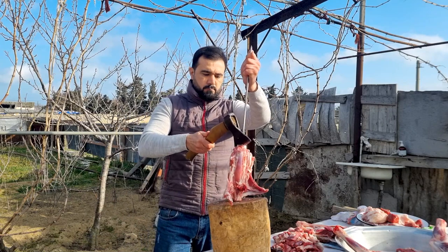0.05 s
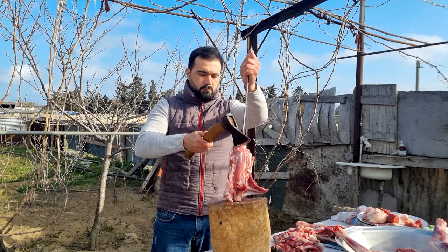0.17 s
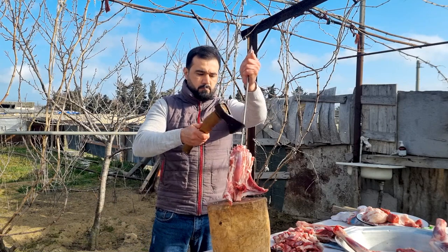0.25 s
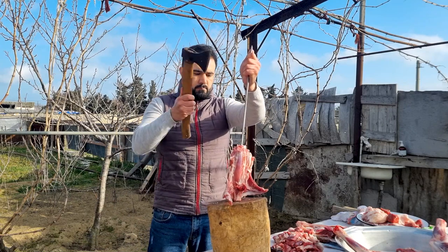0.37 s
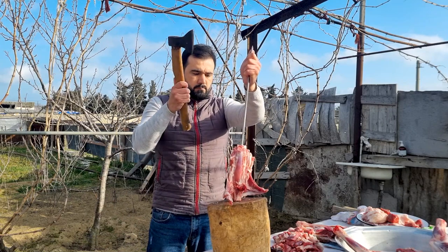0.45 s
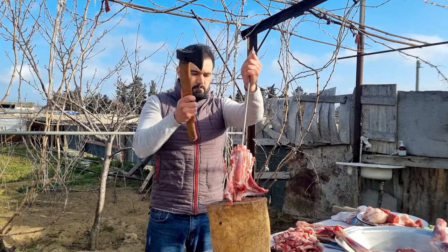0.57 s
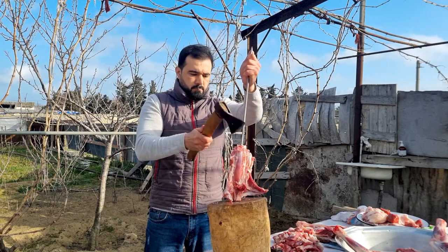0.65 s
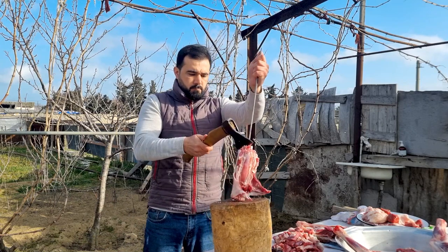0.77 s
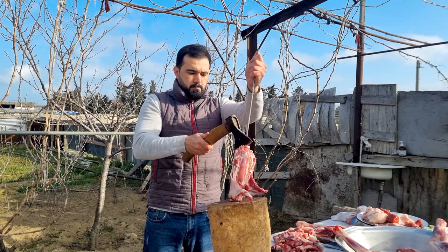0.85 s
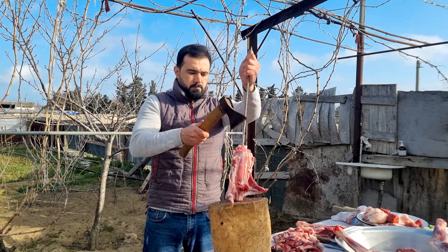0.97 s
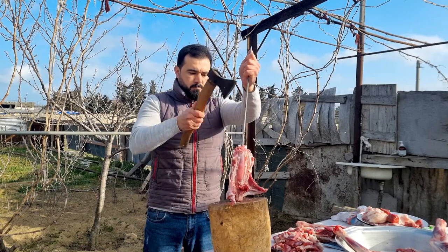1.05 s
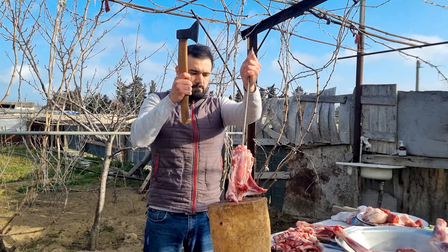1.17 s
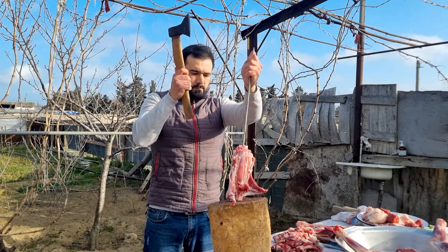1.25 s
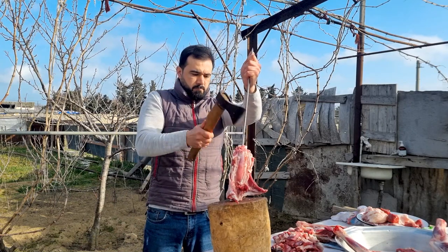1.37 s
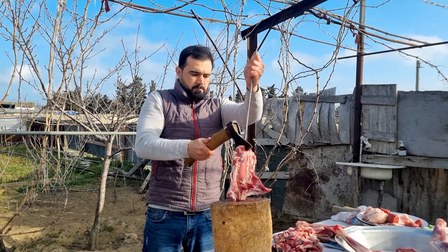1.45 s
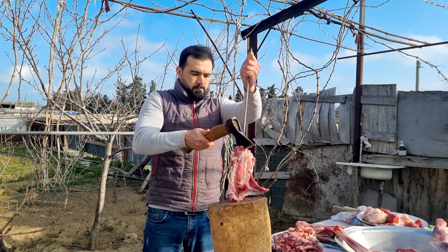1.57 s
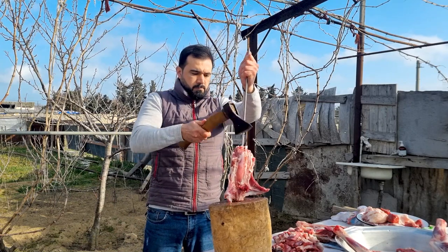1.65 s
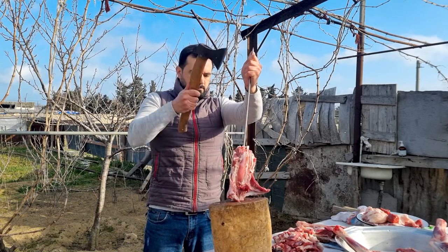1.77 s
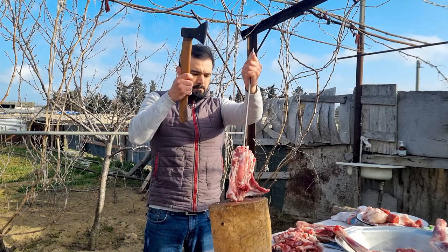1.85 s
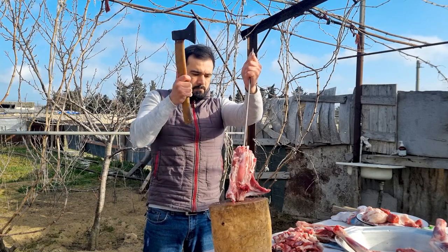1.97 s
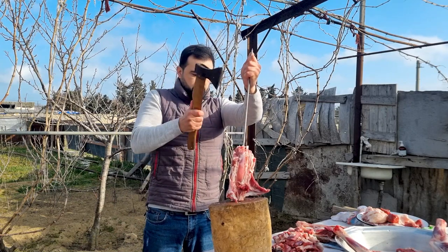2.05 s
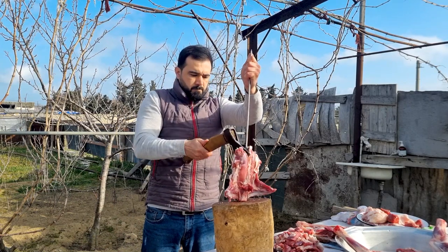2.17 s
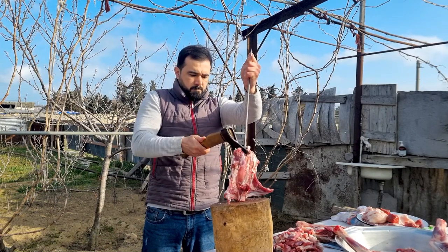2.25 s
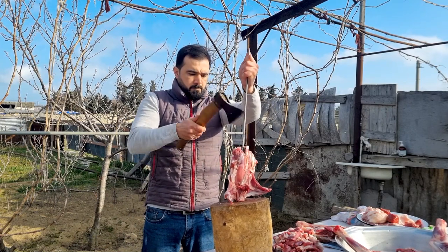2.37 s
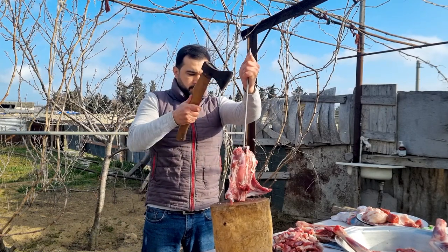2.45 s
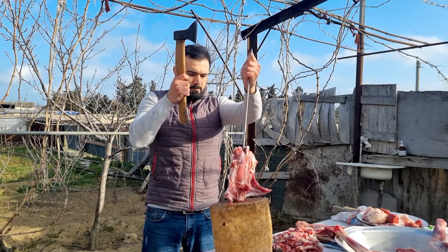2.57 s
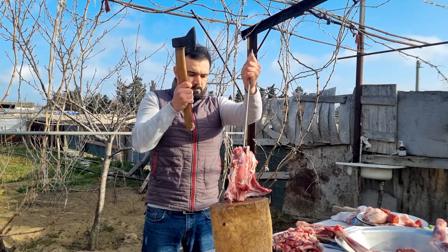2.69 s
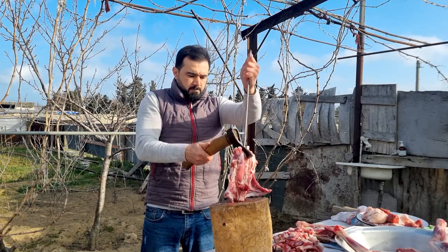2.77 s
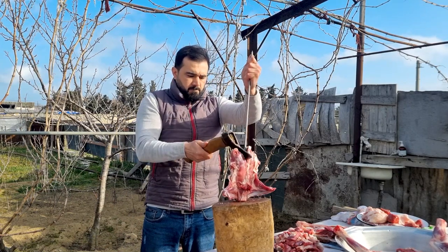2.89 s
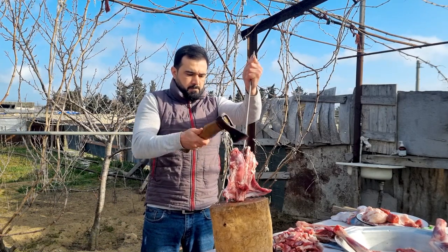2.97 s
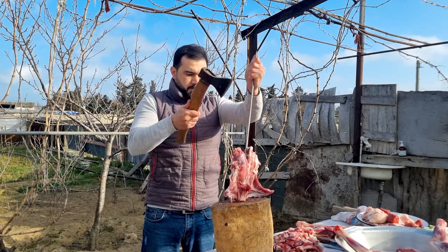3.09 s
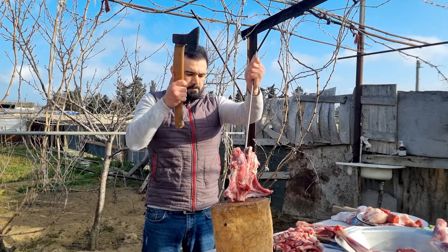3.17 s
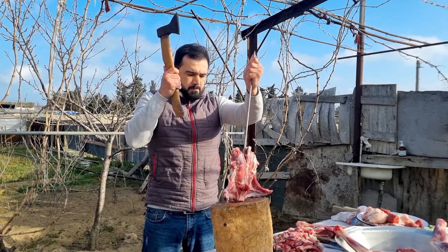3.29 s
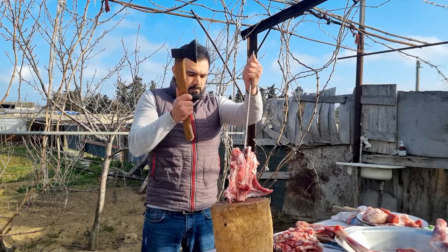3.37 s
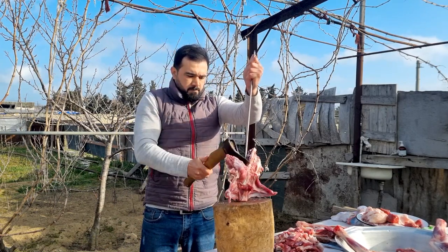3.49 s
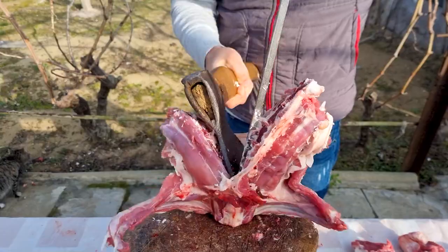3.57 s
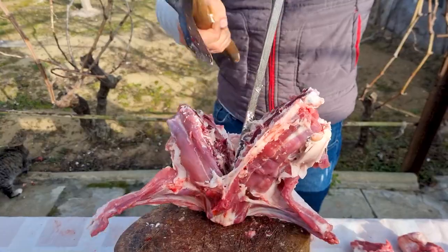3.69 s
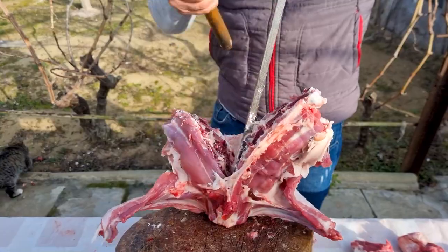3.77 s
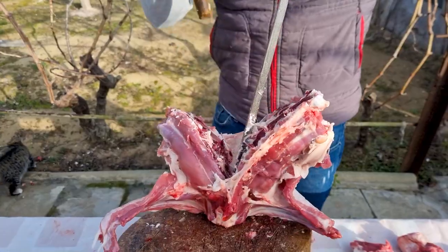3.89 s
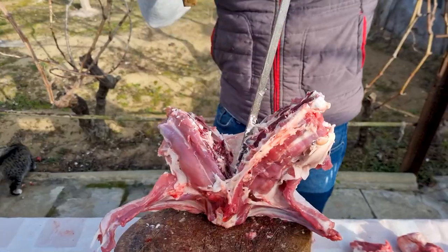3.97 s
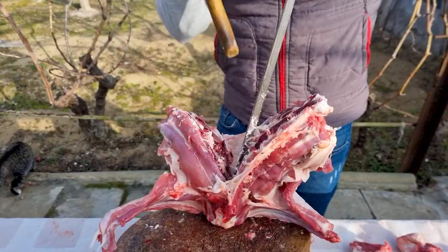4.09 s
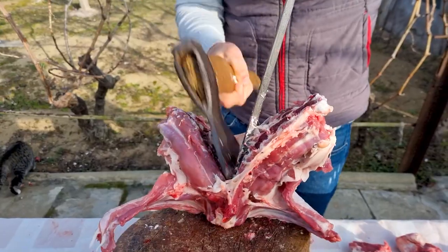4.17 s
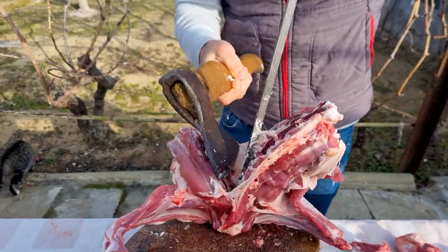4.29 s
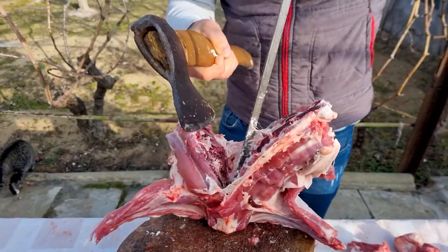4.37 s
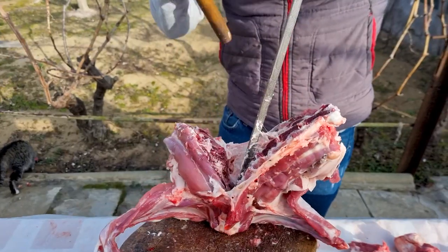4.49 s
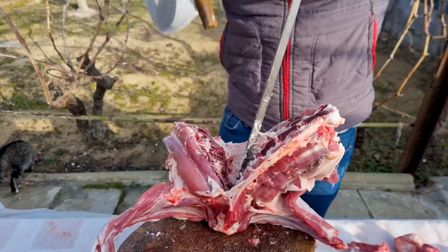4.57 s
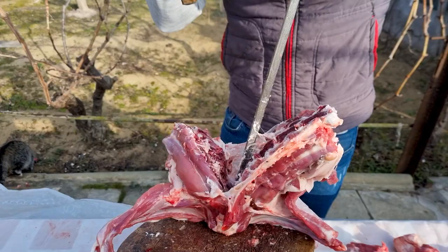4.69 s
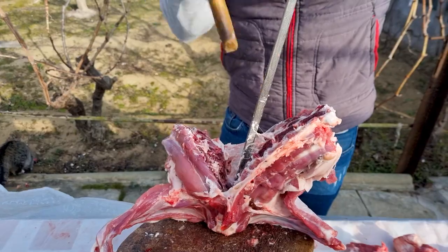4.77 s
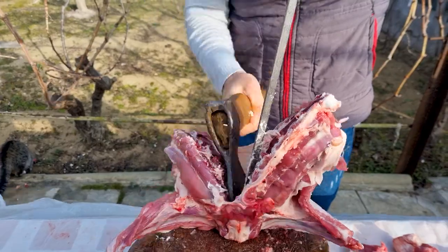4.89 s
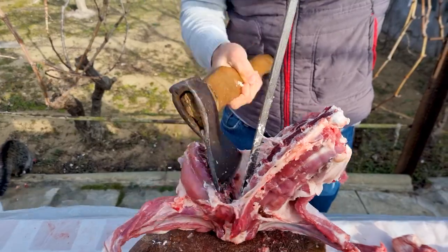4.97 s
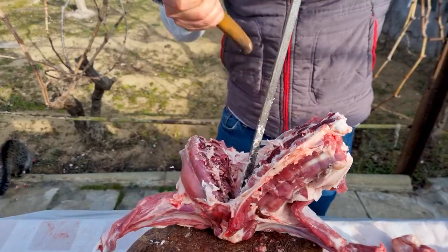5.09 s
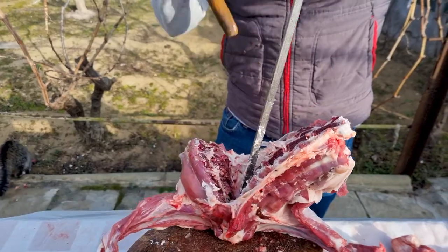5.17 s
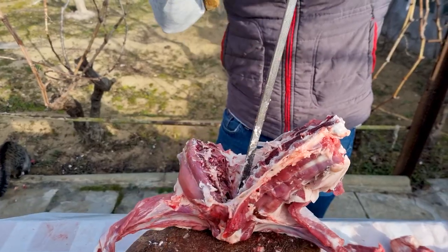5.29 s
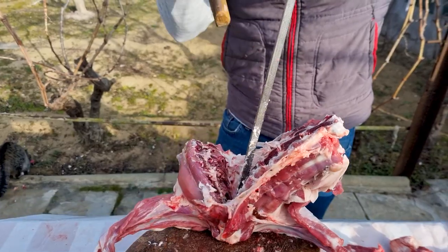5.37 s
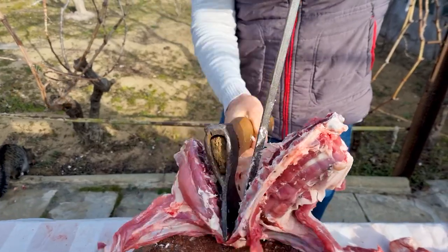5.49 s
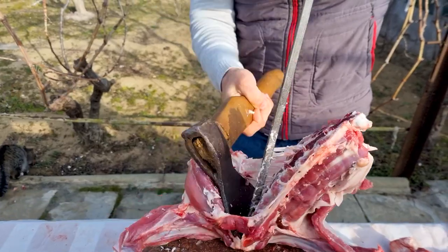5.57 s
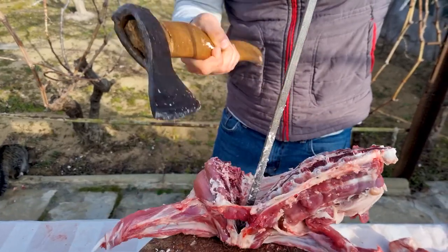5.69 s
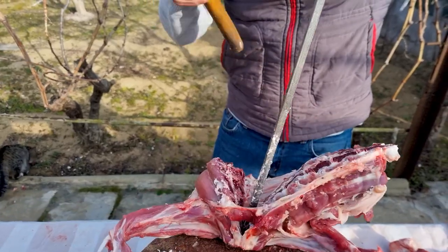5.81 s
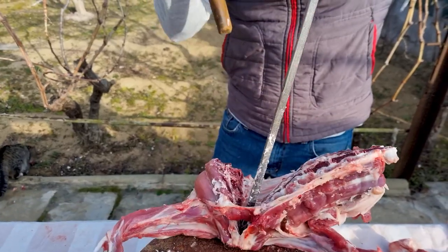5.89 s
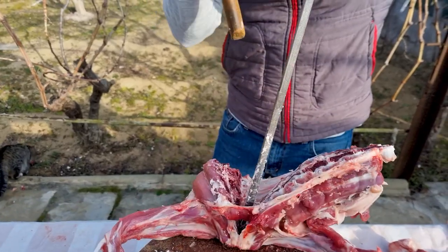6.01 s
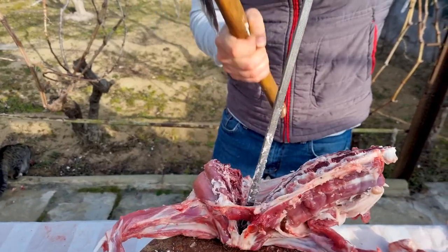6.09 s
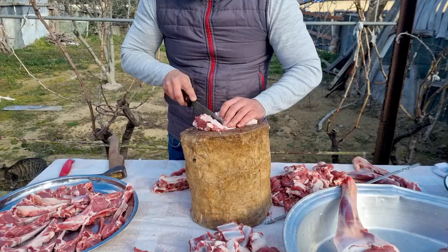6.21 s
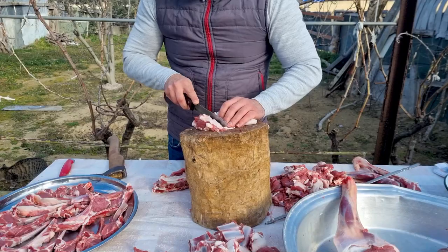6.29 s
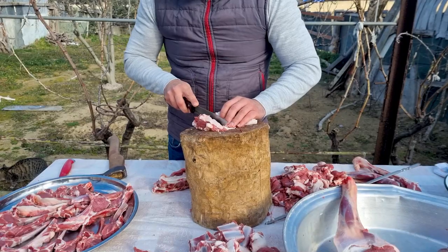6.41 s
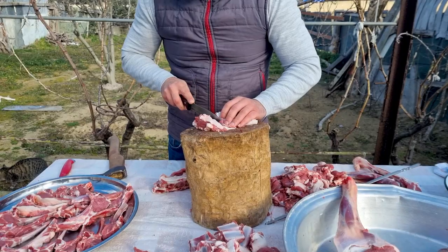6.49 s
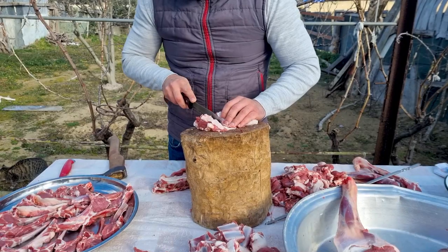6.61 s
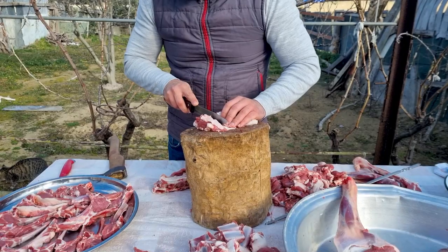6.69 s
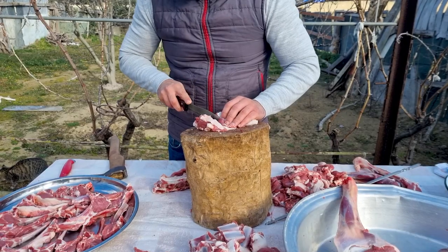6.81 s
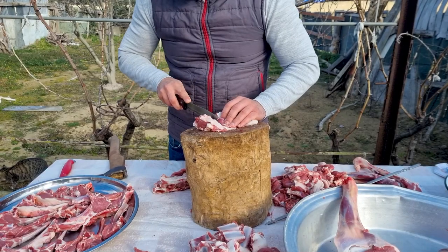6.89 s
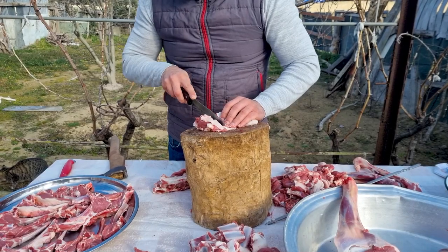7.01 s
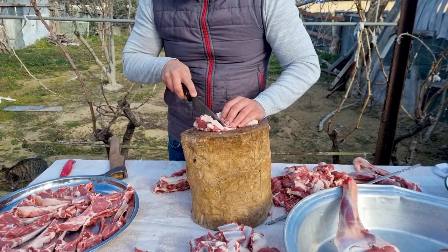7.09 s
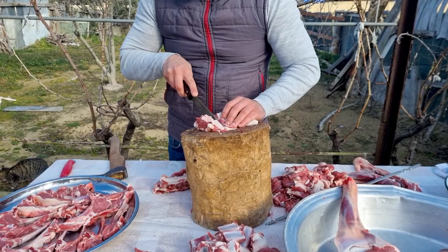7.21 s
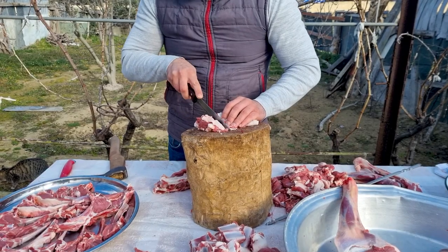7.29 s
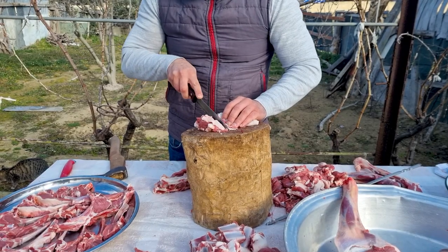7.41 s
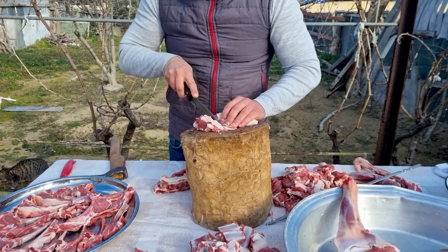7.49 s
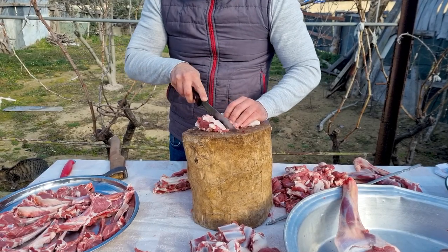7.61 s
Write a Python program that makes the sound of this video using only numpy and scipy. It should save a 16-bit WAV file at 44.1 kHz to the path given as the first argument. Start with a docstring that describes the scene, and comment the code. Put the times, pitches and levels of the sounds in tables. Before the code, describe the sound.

A hatchet chops meat and bone on a wooden block, nine loud blows about 0.7 seconds apart. Each is a sharp crack with a wet crunch, low thump and quick rattle of block, table and metal trays. The first five have a short yard echo; the last four are closer and drier, with wind buffeting the microphone. After the last chop, faint traffic hiss and machine whine step up.

```python
"""Nine sharp bony cracks, each with a thump and a rattle: a hatchet chops through ribs on a wooden block in a yard.
Each blow snaps bone with noise and a short note, thumps the block in a few decaying modes, and sets it knocking
on a table with metal trays; the blade rings faintly. The first five blows are heard from afar, the rest from
close by. Shaped noise makes the low rumble, the wind on the microphone and far traffic; a faint machine whines."""
import sys
import numpy as np
from scipy import signal
from scipy.fft import rfft, irfft, next_fast_len
from scipy.io import wavfile
from scipy.ndimage import uniform_filter1d, map_coordinates

SR = 44100
rng = np.random.default_rng(int(sys.argv[2]) if len(sys.argv) > 2 else 0)


def dump(signal):
    """Clip the signal to [-1, 1] and save it as 16-bit WAV at the path in sys.argv[1]."""
    limited = np.clip(np.atleast_2d(signal).T, -1, 1)
    pcm = np.round(limited * 32767).astype(np.int16)
    wavfile.write(sys.argv[1], SR, pcm)


N = 337365
T = np.arange(SR // 2) / SR  # seconds within one short sound
CLOCK = np.arange(N) / SR  # seconds within the whole scene
MOVE_CLOSE_S = 3.75  # from here on the block is heard from close by
SHADE_DB = -1  # from close by, the block hides the table and dulls its knock


def amp(db):
    """Decibels to gain."""
    return 10 ** (np.asarray(db) / 20)


def unit(x):
    """Scale to rms 1."""
    return x / np.sqrt(np.mean(x ** 2) + 1e-20)


def along(points, hz):
    """(Hz, value) points read on a log axis."""
    f, v = np.transpose(points)
    return np.interp(np.log(hz + 1), np.log(f + 1), v)


def wobble(rate):
    """A smooth random curve, rate knots a second."""
    return map_coordinates(rng.standard_normal(int(N * rate / SR) + 4), [CLOCK * rate])


def noise(colour, alike, size=len(T)):
    """Coloured stereo noise of rms 1 whose channels share the part alike."""
    common, *own = rng.standard_normal((3, size))
    alike = np.clip(alike, 0, 1)
    pair = np.sqrt(alike) * common + np.sqrt(1 - alike) * np.array(own)
    m = next_fast_len(size)
    gains = amp(along(colour, np.fft.rfftfreq(m, 1 / SR)))
    return unit(irfft(rfft(pair, m) * gains, m)[:, :size])


def fade(t60, attack=0.00051):
    """A quick rise, then an exponential decay by 60 dB in t60 seconds."""
    rise = 1 - np.exp(-T / max(attack, 1e-5))
    return np.exp(-np.log(1000) * T / max(t60, 1e-3)) * rise


def swell(s, half):
    """A bell-shaped rise and fall around time s."""
    return np.exp(-np.minimum(((CLOCK - s) / half) ** 2, 20))


def grit(depth_db, size):
    """An envelope of rms 1 that jumps about, as fibres give way unevenly."""
    jumps = unit(uniform_filter1d(rng.standard_normal(len(T)), size=size))
    return unit(amp(depth_db * jumps))


def ring(modes, detune):
    """Metal modes, struck at new strengths each time and reaching each ear at another phase."""
    draws = rng.standard_normal((len(modes), 4))
    out = 0
    for (hz, db, t60), d in zip(modes, draws):
        tone = np.sin(2 * np.pi * hz * (1 + detune * d[1]) * T + d[2:, None])
        out = out + amp(db + 2 * d[0]) * fade(t60) * tone
    return out


def pan(db):
    """Channel gains for a left-right difference."""
    gains = amp([[db / 2], [-db / 2]])
    return gains / gains.mean()


def add(track, s, sound):
    """Mix a sound in at time s."""
    part = track[:, round(s * SR):][:, :sound.shape[-1]]
    part += sound[..., :part.shape[1]]


def microphone(x, balance, lead_s):
    """Sound from the block reaches the left port first, and each port colours it differently."""
    size = x.shape[-1]
    m = next_fast_len(size + len(T))
    hz = np.fft.rfftfreq(m, 1 / SR)
    side = np.array([[.5], [-.5]])
    gains = amp(side * along(balance, hz))
    lead = np.exp(2j * np.pi * side * hz * lead_s)
    return irfft(rfft(x, m) * gains / gains.mean(axis=0) * lead, m)[:, :size]


# Blade meets bone. Each row: start in seconds, crack level in dB, bone pitch in Hz, bone note in dB
# and splintering in dB (both re the crack level), extra crack colour above 10 kHz in dB.
CHOPS = [(0.7282, -7.5, 5100, 1, -16, 0.5), (1.462, -7, 2634, -3.5, -11, 2.5),
         (2.1584, -9, 2650, 0.5, -10.5, 4.5), (2.8485, -7.5, 2644, -2, -11, -1),
         (3.516, -7.5, 2810, -2, -6, -2.5), (4.231, -9.5, 5365, 4.5, -20.5, -1),
         (4.9039, -8.5, 5110, 0, -12.5, 2), (5.5413, -5.5, 4120, -9, -12, 2),
         (6.1883, -5.5, 4190, 3, -13.5, 8)]
# Close modes of the bone. Each row: multiple of its pitch, level in dB.
BONE_MODES = [(.87, -8.5), (1, -1.5), (1.07, -8)]
# Colour of the crack from afar and from close by. Each row: frequency in Hz, level in dB per Hz.
CRACK_FAR = [(300, -22), (850, -18.5), (1150, -1), (2300, -13.5), (2750, -13.5), (3300, -15.5),
             (4300, -6.5), (5200, -1.5), (6200, -8.5), (7600, -38.5), (10000, -26.5), (12000, -22),
             (15000, -27), (17000, -41.5)]
CRACK_NEAR = [(300, -15.5), (700, -12), (1000, -11.5), (1650, -2), (2300, -8.5), (3300, -8.5), (4200, 0),
              (5600, -4), (7000, -20.5), (8500, -38), (10500, -27.5), (12200, -12.5), (14500, -23.5),
              (17000, -35.5)]
# Balance of the crack on the microphone, afar and close. Each row: frequency in Hz, left-right difference in dB.
SIDE_FAR = [(700, 7), (1600, 12), (2700, 14.5), (5500, 13), (10000, 11.5), (14500, 1.5)]
SIDE_NEAR = [(1000, -11), (1750, -10.5), (2600, 1), (6500, 3), (9000, -2.5), (12000, -11.5)]
SPLINTER_S = 0.0097  # how long the bone splinters


def cracks():
    """The edge snaps the bone, which sounds one very short note and splinters for some milliseconds."""
    out = np.zeros((2, N))
    for s, db, bone_hz, bone_db, split_db, top_db in CHOPS:
        colour, balance = (CRACK_FAR, SIDE_FAR) if s < MOVE_CLOSE_S else (CRACK_NEAR, SIDE_NEAR)
        colour = [(hz, level + top_db * (hz > 10 ** 4)) for hz, level in colour]
        snap = amp(3.0) * fade(.007, attack=.0003)
        split_shape = (1 - np.exp(-T / 0.002)) / (1 + (T / SPLINTER_S) ** 6)
        splitting = amp(split_db) * grit(depth_db=2.0, size=30) * split_shape
        note = sum(amp(level) * np.sin(2 * np.pi * bone_hz * k * T) for k, level in BONE_MODES)
        bone = amp(bone_db) * fade(0.021, attack=0.00037) * note
        crack = (snap + splitting) * noise(colour, alike=.7) + bone
        add(out, s, amp(db) * microphone(crack, balance, lead_s=0.00033))
    return out


# How the block answers each chop. Each row: thud level in dB before a common trim, thud pitch in Hz,
# then delay in seconds after the crack and relative level in dB of the slam, the landing and the settling.
BOUNCES = [(-7, 112, 0.021, -6, .062, -14, .105, -30), (-9.5, 127, .029, -2.5, .077, -8.5, .134, -25.5),
           (-13, 120, 0.031, -11, .074, -11, 0.09, -30.5), (-9.5, 125, .027, -4.5, .075, -13, 0.15, -39),
           (-9, 125, 0.025, -3.5, .076, -9.5, .172, -14.5),
           (-10, 103, 0.031, -12.5, .07, -15.5, .125, -17.5),
           (-9.5, 110, 0.04, -14.5, .07, -16, .127, -23.5), (-5, 103, .009, -9.5, .068, -14, .134, -18.5),
           (-10.5, 91, .014, -3.5, .072, -18.5, .144, -28)]
# Modes of the block. Each row: multiple of the thud pitch, level in dB, share of the decay time.
BLOCK_MODES = [(.6, -15, 1.8), (1, -1.5, 0.77), (1.55, -9, 0.62), (2.7, -16, 0.73)]
THUD_DELAY_S, THUD_T60_S = .008, .17


def thuds():
    """The meat passes a soft push to the heavy block, which bounces in a few low modes."""
    out = np.zeros((2, N))
    for (s, *_), (db, hz, *_) in zip(CHOPS, BOUNCES):
        body = 0
        for k, level, share in BLOCK_MODES:
            decay = fade(THUD_T60_S * share, attack=0.00047)
            body = body + amp(level) * decay * np.sin(2 * np.pi * hz * k * T)
        add(out, s + THUD_DELAY_S, amp(db + 1.0) * body * pan(-0.98))
    return out


# Colour of the woody knock. Each row: frequency in Hz, level in dB per Hz.
KNOCK_COLOUR = [(120, -13.5), (200, -2.5), (300, 10), (520, 3.5), (760, 0.5), (1300, -4), (1800, -2),
                (2100, -17.5), (5000, -53.5)]
# Colour of the clatter, also of the wet crunch. Each row: frequency in Hz, level in dB per Hz.
CLATTER_COLOUR = [(1200, -19), (2000, -0.5), (2900, -0.5), (4200, -3.5), (5600, -4.5), (6800, -10.5),
                  (8000, -24), (10500, -25.5), (12500, -12), (16000, -27)]
# Ringing of the metal trays. Each row: frequency in Hz, mean level in dB before a trim, decay t60 in seconds.
TRAYS = [(524.4, -6, 0.094), (725, -9.5, 0.1), (1257, -13, .1), (1355, -11.5, 0.12), (1656, -14.5, 0.076),
         (1745, -17.5, .13)]


def knock(contact, shade_db):
    """The block hits the table: a thump, a woody knock, a bright clatter and ringing trays."""
    db, thump_db, clatter_db, t60 = contact
    colour = [(hz, level + shade_db * (hz > 600)) for hz, level in KNOCK_COLOUR]
    wood = fade(t60, attack=0.00093) * noise(colour, alike=0.74) * pan(5)
    thump_hz = 165 * (1 + 0.42 * rng.standard_normal())
    thump = amp(thump_db + 3) * fade(0.087, attack=0.0021) * np.sin(2 * np.pi * thump_hz * T)
    clatter = amp(clatter_db + shade_db - 7) * fade(0.047) * noise(CLATTER_COLOUR, alike=0.1) * pan(20)
    trays = amp(shade_db - 4.0) * ring(TRAYS, detune=0.01) * pan(5.1)
    return amp(db - 7) * (wood + thump + clatter + trays)


# The block meets the table five times after every chop. Each row: level in dB re its level in BOUNCES,
# thump and clatter in dB re the knock, all before the trims in knock(), and decay t60 of the wood in seconds.
TIP = (-3, -4.5, -17.5, 0.0111)  # one edge first; level re the slam
SLAM = (-0.5, -3.5, -14, 0.07)  # then the whole base
LANDING = (0.5, -4.5, -6, 0.0371)  # down again after a hop
ROCK = (-1, 4.5, -11.5, 0.1052)  # over to the other edge; level re the settling
SETTLE = (0, -8, -20.5, 0.1045)  # at rest
TIP_SHARE, ROCK_SHARE = .6, .72  # of the slam delay, of the settling delay


def knocks():
    """Each chop tips the block and slams it on the table; it hops, lands, rocks and settles."""
    out = np.zeros((2, N))
    for (s, *_), bounce in zip(CHOPS, BOUNCES):
        _, _, slam_s, slam_db, landing_s, landing_db, settle_s, settle_db = bounce
        shade_db = SHADE_DB * (s > MOVE_CLOSE_S)
        contacts = [(TIP_SHARE * slam_s, slam_db, TIP),
                    (slam_s, slam_db, SLAM),
                    (landing_s, landing_db, LANDING),
                    (ROCK_SHARE * settle_s, settle_db, ROCK),
                    (settle_s, settle_db, SETTLE)]
        for delay, db, contact in contacts:
            add(out, s + delay, amp(db) * knock(contact, shade_db))
    return out


# Ring of the steel. Each row: frequency in Hz, mean level in dB, decay t60 in seconds.
BLADE = [(1820, -12.5, 0.44), (2700, -6.5, 0.49), (5140, -7, 0.36)]
# The blade rings on as it is worked loose. Each row: start in seconds, level in dB over that of its last mode.
PINGS = [(0.968, -43), (1.648, -55)]
CRUNCH_DB, BLADE_DB = -25, -45.5  # wet meat; ring of the steel


def crunches():
    """The blade sinks on through wet meat, fibre by fibre, and its steel rings faintly."""
    out = np.zeros((2, N))
    for s, *_ in CHOPS:
        fibres = grit(depth_db=6, size=60) * fade(0.16, attack=0.0058)
        crunch = amp(CRUNCH_DB) * fibres * noise(CLATTER_COLOUR, alike=0.087) * pan(14.0)
        blade_db = BLADE_DB + SHADE_DB * (s > MOVE_CLOSE_S)
        add(out, s, crunch + amp(blade_db) * ring(BLADE, detune=0.00049))
    for s, db in PINGS:
        add(out, s, amp(db) * ring(BLADE[-1:], detune=0.00029))
    return out


# Small bits of bone snap. Each row: start in seconds, level in dB.
TICKS = [(0.8931, -43), (1.65, -52.5), (2.544, -46.5), (3.5978, -28), (3.636, -29), (4.2616, -27)]
# Meat and blade rub. Each row: middle in seconds, level in dB, half length in seconds.
RUBS = [(0.167, -51.5, 0.037), (4.595, -63, .008), (5.15, -67.5, .022), (5.341, -69, 0.014),
        (6.043, -64.5, 0.035), (6.688, -66, 0.016), (7.337, -70, 0.036), (7.52, -74, 0.029)]


def scraps():
    """Splinters snap, and the blade rubs and catches softly in the cut."""
    out = np.zeros((2, N))
    click = fade(.03)
    tick_colour = [(1000, -16), (3500, -11.5), (5300, 7.5), (8000, -23.5), (15000, -32)]  # (Hz, dB per Hz)
    for s, db in TICKS:
        add(out, s, amp(db) * click * noise(tick_colour, alike=.4) * pan(4.7))
    catching = unit(amp(3.5 * wobble(200)))
    strokes = catching * sum(amp(db) * swell(s, half) for s, db, half in RUBS)
    rub_colour = [(600, -6), (1600, -4.0), (2600, 0.5), (5200, -5.5), (8000, -29), (15000, -37.5)]
    return out + strokes * noise(rub_colour, alike=.3, size=N)


# How the yard dies away. Each row: frequency in Hz, decay t60 in seconds.
YARD_T60 = [(100, 0.58), (500, 0.28), (2000, .33), (5500, 0.26), (9000, 0.14), (15000, 0.067)]


def yard(x):
    """Fence and sheds scatter a short tail, different for every stretch of sound."""
    out = np.zeros((2, N))
    for start in range(0, N, len(T)):
        hz, t, z = signal.stft(rng.standard_normal((2, len(T))), SR, nperseg=256)
        decay = np.exp(-np.log(1000) * t / along(YARD_T60, hz)[:, None])
        tail = signal.istft(z * decay, SR, nperseg=256)[1][:, :len(T)]
        tail = tail * (1 - np.exp(-T / 0.022))  # the scatter builds up
        stretch = x.mean(axis=0)[None, start:start + len(T)]
        add(out, start / SR, signal.fftconvolve(stretch, tail / np.linalg.norm(tail[0]), axes=1))
    return out


# Colour of a hand against the microphone. Each row: frequency in Hz, level in dB per Hz.
NUDGE_COLOUR = [(100, -7), (260, 3), (700, -6.5), (1300, -19.5), (2200, -50), (6000, -69)]
NUDGE_S, NUDGE_DB, NUDGE_T60_S = 5.279, -24, 0.049


def bump():
    """A hand bumps the microphone: a dull knock carried through its body."""
    out = np.zeros((2, N))
    thud = fade(NUDGE_T60_S, attack=.001) * noise(NUDGE_COLOUR, alike=.5)
    add(out, NUDGE_S, amp(NUDGE_DB) * thud * pan(3.4))
    return out


GUST_ATTACK_S, GUST_RELEASE_S, GUST_SWING_DB = 0.015, .018, 2


def gust(start, length):
    """Rise, hold for a length of time, die away."""
    rise = np.clip((CLOCK - start) / GUST_ATTACK_S, 0, 1)
    return rise * np.exp(-np.clip((CLOCK - start - length) / GUST_RELEASE_S, 0, 20))


# Course of the low rumble. Each row: time in seconds, level in dB before RUMBLE_DB is added.
RUMBLE_COURSE = [(0.0, -46), (1.43, -45), (2.6, -54), (2.81, -46), (3.49, -55.5), (3.66, -42), (4.71, -52),
                 (4.83, -40), (5.5, -38), (5.65, -59.5), (5.86, -47), (6.07, -35), (6.35, -41.5),
                 (7.65, -51)]
# Colours of the rumble, the eddies and their flutter. Each row: frequency in Hz, level in dB per Hz.
RUMBLE_COLOUR = [(15, -25.5), (28, -12), (50, -2), (72, 1.5), (105, -4), (140, -17), (280, -30.5),
                 (2500, -120)]
EDDY_COLOUR = [(15, -27), (35, -9.5), (65, 7), (115, 1.5), (180, -5.5), (260, -19.5), (1200, -120)]
FLUTTER_COLOUR = [(100, -31), (200, 1), (320, 3), (500, -10.5), (800, -30.5), (1500, -51), (7000, -120)]
# Gusts on the microphone ports. Each row: start in seconds, length in seconds, level in dB before
# the common buffeting gain, flutter in dB re the gust.
GUSTS = [(3.91, .06, -33.5, -25.5), (4.143, 0.047, -37.5, -27), (4.686, 0.29, -31, -12.5),
         (5.083, 0.25, -31.5, -16), (5.381, 0.058, -37, -28), (5.828, 0.047, -29, -19),
         (5.948, 0.28, -30, -14.5), (6.587, 0.06, -35, -27), (6.978, .12, -32.5, -36.5),
         (7.596, .05, -42.5, -8)]
# Single hard eddies. Each row: middle in seconds, level in dB before that gain, flutter in dB re the eddy.
PUFFS = [(3.876, -21.5, -17.5), (4.702, -26.5, -17), (4.817, -23.5, -20), (5.288, -25.5, -9.5),
         (6.65, -28.5, -29)]
PUFF_HALF_S = 0.01  # half length of an eddy
RUMBLE_DB, BUFFETING_DB = 1.5, 2.5


def wind():
    """A low rumble of varying level, and gusts and eddies that thump and flutter on the microphone ports."""
    rumble = noise(RUMBLE_COLOUR, alike=.5, size=N)
    rumble_db = RUMBLE_DB + np.interp(CLOCK, *np.transpose(RUMBLE_COURSE))
    swing = amp(GUST_SWING_DB * wobble(25))
    pushes = [(amp(db) * swing * gust(s, length), flutter_db) for s, length, db, flutter_db in GUSTS]
    pushes += [(amp(db) * swell(s, PUFF_HALF_S), flutter_db) for s, db, flutter_db in PUFFS]
    eddy = sum(push for push, _ in pushes)
    flutter = sum(amp(flutter_db) * push for push, flutter_db in pushes)
    lumps = unit(amp(3 * wobble(120)))
    thumping = eddy * noise(EDDY_COLOUR, alike=0.24, size=N)
    fluttering = flutter * lumps * noise(FLUTTER_COLOUR, alike=0.25, size=N)
    return amp(rumble_db) * rumble + amp(BUFFETING_DB) * (thumping + fluttering)


# Colour of far traffic. Each row: frequency in Hz, level in dB per Hz.
AIR_COLOUR = [(100, -8), (250, 0), (450, 2.5), (680, -1.5), (1100, -6.5), (1800, -12), (2300, -19.5),
              (3800, -23), (5500, -29.5), (8000, -51), (16000, -47.5)]
# A far machine. Each row: frequency in Hz, mean rms level in dB after the step up.
WHINE = [(646, -72.5), (1922, -76.5), (3844, -82)]
TRAFFIC_DB = -71  # before the step
STEP_DB, STEP_AT_S, STEP_S = 14, 6.41, 0.062  # after the last chop, hiss and whine are suddenly louder


def distance():
    """Far traffic hisses and a machine whines faintly within it; both are suddenly louder near the end."""
    step_db = STEP_DB * np.clip((CLOCK - STEP_AT_S) / STEP_S, 0, 1)
    whine = 0
    for hz, db in WHINE:
        level = amp(db + 1.1 * wobble(1.5)) * np.sqrt(2)
        whine = whine + level * np.sin(2 * np.pi * hz * CLOCK + 0.99 * wobble(8.2))
    traffic = amp(TRAFFIC_DB + step_db) * noise(AIR_COLOUR, alike=.3, size=N)
    return traffic + amp(step_db - STEP_DB) * whine


# Balance of the other block sounds on the microphone. Each row: frequency in Hz, left-right difference in dB.
PORTS = [(1000, -1.5), (2500, 5), (5500, 3.5), (12000, -3.5)]


def scene():
    """The chopping with its reverberation, drier from close by, over wind and far traffic."""
    crack = cracks()
    rest = microphone(crunches() + knocks() + scraps() + thuds(), PORTS, lead_s=.00022)
    # keep the thuds and knocks free of bass below about 50 Hz
    no_bass = signal.butter(2, 50, "highpass", fs=SR, output="sos")
    rest = signal.sosfilt(no_bass, rest)
    wet = amp(np.where(CLOCK < MOVE_CLOSE_S, -15, -24))
    reverberation = yard(wet * (crack + amp(-7) * rest)) * pan(7)
    return crack + rest + reverberation + wind() + bump() + distance()


TOP_HZ = 16300  # band limit


def record(dry):
    """The loudest peaks are rounded off, and a steep low-pass removes what lies above the band limit."""
    rounded = dry / (1 + np.abs(dry / .9) ** 6) ** (1 / 6)
    m = next_fast_len(N + len(T))
    lowpass = 1 / (1 + (np.fft.rfftfreq(m, 1 / SR) / TOP_HZ) ** 120)
    return irfft(rfft(rounded, m) * lowpass, m)[:, :N]


dry = scene()
out = record(dry)
dump(out)
```